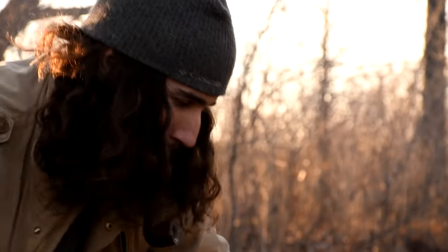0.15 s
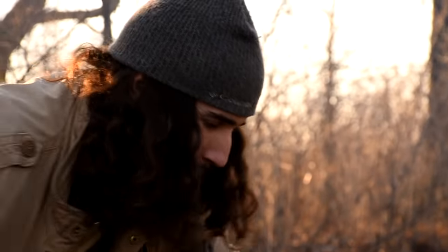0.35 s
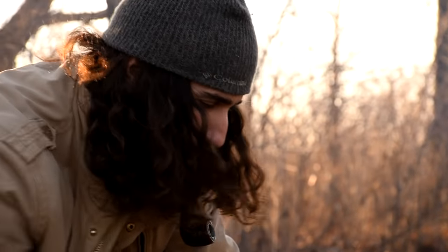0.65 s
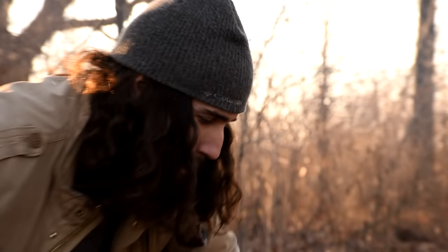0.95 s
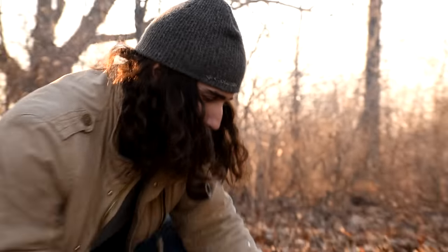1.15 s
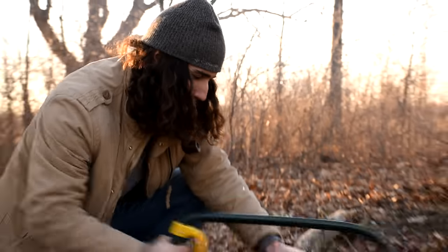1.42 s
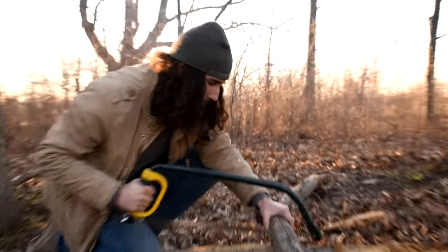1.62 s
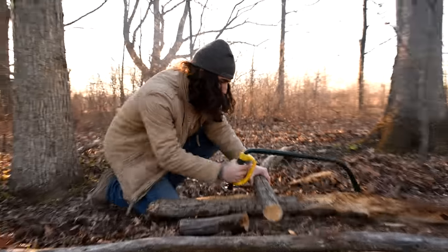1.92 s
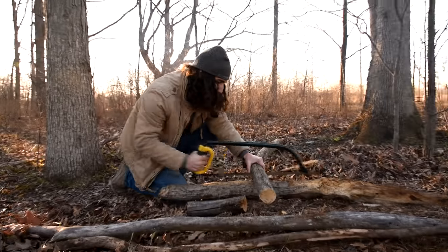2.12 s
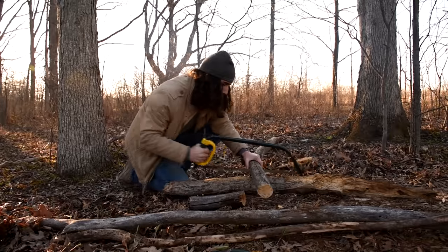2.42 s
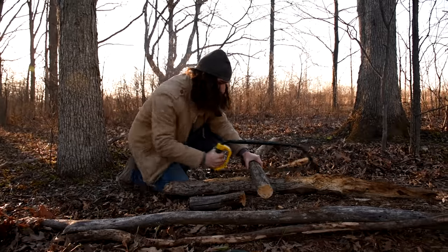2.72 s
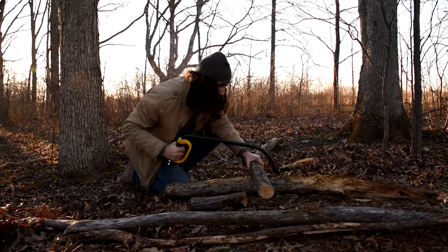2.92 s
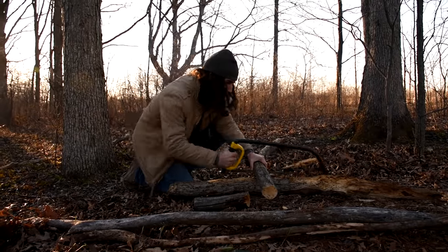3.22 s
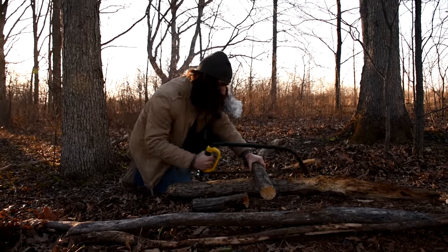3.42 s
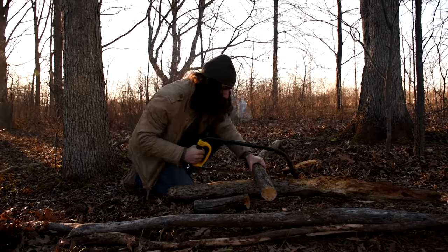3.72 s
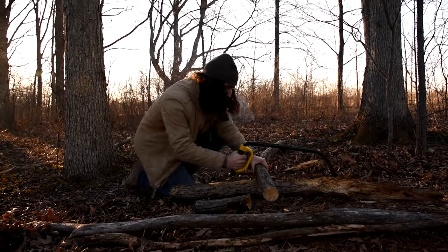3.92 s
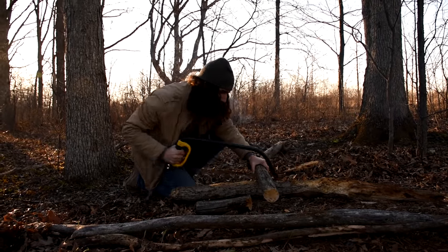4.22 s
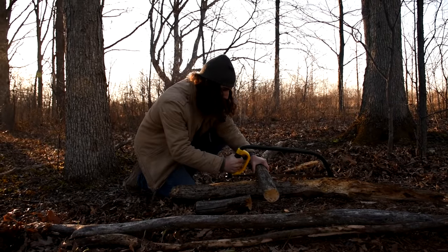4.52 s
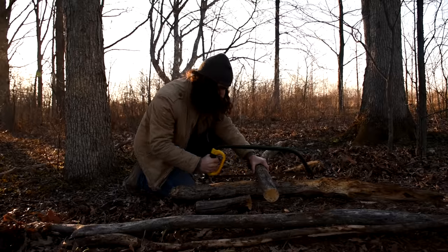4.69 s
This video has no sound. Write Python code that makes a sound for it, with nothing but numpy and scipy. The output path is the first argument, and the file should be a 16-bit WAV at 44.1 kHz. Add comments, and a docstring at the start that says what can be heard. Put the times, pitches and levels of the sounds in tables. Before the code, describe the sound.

A hand saw works steadily through dry wood outdoors, heard close to the microphone. Rough tearing strokes swell and dip in a fast, even rhythm, with steel blade and frame ringing, the log humming briefly, and occasional snags and snaps. Wind buffets the microphone softly over a thin leaf rustle; trunks return only a slight short echo. The sawing continues until the end.

```python
"""Wind rumbles, and almost at once a bow saw starts cutting a dry log in a wood, about three strokes a second.
Teeth tear fibres in a dense, uneven rattle: random clicks that rasp and hiss in the cut, thud in the log
and ring the steel blade and frame. Snagged teeth snap as bursts of noise; the log hums and, while
the saw turns, thin squeaks sing as gliding notes. The wind is coloured noise, and a fading
noise tail makes the trees answer faintly."""
import sys
import numpy as np
from scipy import signal
from scipy.fft import rfft, irfft, next_fast_len
from scipy.io import wavfile
from scipy.ndimage import uniform_filter1d, map_coordinates

SR = 44100
rng = np.random.default_rng(int(sys.argv[2]) if len(sys.argv) > 2 else 0)


def dump_mix(stems):
    """Bounce the given channels to the path in sys.argv[1] as a 16-bit WAV at rate SR."""
    frames = np.atleast_2d(stems).T  # one column per channel
    limited = np.clip(frames, -1, 1)  # hard clip at full scale
    pcm = np.round(limited * 32767).astype(np.int16)
    wavfile.write(sys.argv[1], SR, pcm)


def convert_level_to_amplitude(level_db):
    """Map a level in decibels to its linear amplitude factor."""
    exponent = np.asarray(level_db, float) / 20
    return 10 ** exponent


N = 214095  # length of the scene in samples

# saw strokes, push and pull in turn, levels before the mix:
# (start [s], fastest [s], stop [s], rasp at full speed [dB], hiss over rasp [dB])
STROKES = [(.028, .199, 0.32, -20.5, -2.5), (.327, .522, 0.62, -16, -4.5), (.642, .838, 0.964, -21.5, -5),
           (1.044, 1.226, 1.338, -17.5, -3.5), (1.341, 1.515, 1.642, -17.9, -4.2),
           (1.639, 1.865, 1.95, -16, -4), (2.03, 2.19, 2.316, -17.5, -4.5),
           (2.338, 2.542, 2.651, -16.5, -6), (2.699, 2.82, 2.999, -17.5, -4.5),
           (3.026, 3.222, 3.333, -16.5, -3.5), (3.374, 3.528, 3.644, -17, -5.5),
           (3.655, 3.874, 3.979, -16, -5.5), (4.016, 4.105, 4.34, -16, -5.5),
           (4.333, 4.524, 4.609, -15, -3.5), (4.627, 4.821, 4.921, -15, -6.5)]
# the blade bites deeper, or skips, for a moment: (time [s], gain [dB], length [s])
SURGES = [(0.049, 4.5, 0.0038), (0.089, 7, 0.01), (0.158, 3.5, 0.0099), (0.206, 3, 0.013),
          (0.568, 2.5, 0.012), (0.715, 8.5, 0.018), (0.763, 3, 0.017), (0.79, 7, 0.006),
          (0.824, 3.6, 0.012), (0.916, 2.5, 0.02), (0.99, 13, 0.014), (1.248, -4, 0.006),
          (1.376, -6, 0.022), (1.469, 2.5, 0.007), (1.692, 0, 0.0028), (1.908, 5, 0.0079),
          (2.084, 5, 0.016), (2.11, -3, 0.022), (2.36, -1, 0.0023), (2.593, 3.5, 0.027), (2.754, 4, 0.009),
          (2.785, -8, 0.0054), (2.868, 2.5, 0.007), (3.05, 5.5, 0.007), (3.09, -4, 0.0068),
          (3.152, 2.5, 0.013), (3.209, 1.5, 0.018), (3.375, 19, 0.007), (3.416, 4.0, 0.011),
          (3.445, 6.5, 0.0055), (3.489, 0, 0.0081), (3.73, -7, 0.0048), (3.935, 0.5, 0.03),
          (4.036, -5.7, 0.0061), (4.054, 4, 0.0074), (4.113, 1.5, 0.022), (4.168, 4, 0.017),
          (4.281, -1.5, 0.03), (4.362, 5, 0.0036), (4.431, 1.5, 0.0082), (4.75, 3, 0.0084),
          (4.777, 3.5, 0.016)]


def unit(x):
    """Scales a sound to an rms (average strength) of 1."""
    return x / np.sqrt(np.mean(x ** 2) + 1e-20)


def along(points, hz):
    """Reads a curve of (frequency [Hz], value) points, evenly spaced by pitch."""
    f, v = np.transpose(points)
    return np.interp(np.log(hz + 1), np.log(f + 1), v)


def curves(rows):
    """Draws straight lines between rows: one value per sample for each column after the time."""
    s, *columns = np.transpose(rows)
    return [np.interp(np.arange(N) / SR, s, column) for column in columns]


def wobble(rate):
    """A smooth random curve through rate random points a second."""
    points = rng.standard_normal(int(5 * rate) + 9)
    return map_coordinates(points, [np.arange(N) * rate / SR])


def bumps(rows):
    """Adds up brief bell-shaped rises or dips from (time [s], gain [dB], length [s]) rows."""
    out = np.zeros(N)
    for s, db, length in rows:
        first = max(round((s - 3 * length) * SR), 0)
        last = min(round((s + 3 * length) * SR), N)
        i = np.arange(first, last)
        out[i] += db * np.exp(-((i / SR - s) / length) ** 2)
    return out


def filtered(x, response):
    """Multiplies each frequency of x by a response, which may be complex."""
    m = next_fast_len(N + SR // 2)
    return irfft(rfft(x, m) * response(np.fft.rfftfreq(m, 1 / SR)), m)[:N]


def coloured(x, spectrum):
    """Shapes x with (frequency [Hz], level [dB]) points, then scales it to rms 1."""
    return unit(filtered(x, lambda hz: convert_level_to_amplitude(along(spectrum, hz))))


def patchy(x, patchy_db):
    """Each fibre sounds its own colour: random gain patches over time and pitch."""
    z = signal.stft(x, nperseg=256)[2]
    across_pitch = uniform_filter1d(rng.standard_normal(z.shape), 5, 0)
    patches = unit(uniform_filter1d(across_pitch, 7, 1))
    return unit(signal.istft(z * convert_level_to_amplitude(patchy_db * patches), nperseg=256)[1][:N])


def mode(hz, centre_hz, width_hz):
    """One resonance: the response is strongest at its centre and dies away in time after a knock."""
    return 1j * hz * width_hz / (centre_hz ** 2 - hz ** 2 + 1j * hz * width_hz)


def sliding_mode(drive, hz, width_hz):
    """A resonance whose pitch moves: shift down to 0 Hz, ring there, shift back."""
    spin = np.exp(2j * np.pi * np.cumsum(hz) / SR)
    pole = np.exp(-np.pi * width_hz / SR)  # a wider resonance dies sooner
    ringing = signal.lfilter([1 - pole], [1, -pole], drive / spin)
    return 2 * (spin * ringing).real


def tone(rows, rise, drift, octave_db):
    """Short wavering notes with one overtone; each glides, swells over the share rise of its length and fades."""
    out = np.zeros(N)
    bend, waver = 1 + drift * wobble(60), convert_level_to_amplitude(2.9 * wobble(40))
    for start, length, first_hz, last_hz, db in rows:
        i = np.arange(round(start * SR), min(round((start + length) * SR), N))
        u = (i / SR - start) / length  # progress through the note, 0 to 1
        hz = (first_hz + (last_hz - first_hz) * u) * bend[i]
        phase = 2 * np.pi * np.cumsum(hz) / SR
        swell = np.sin(np.pi / 2 * np.interp(u, [0, np.clip(rise, .05, .95), 1], [0, 1, 0]))
        out[i] += convert_level_to_amplitude(db) * swell * (np.sin(phase) + convert_level_to_amplitude(octave_db) * np.sin(2 * phase))
    return 2 ** .5 * waver * out


def wind():
    """Lumpy buffeting on the microphone over a thin rustle of far leaves, both made of coloured noise."""
    # strength of the buffeting: (time [s], level [dB])
    gusts = [(0.0, -28), (0.07, -38), (0.11, -30.5), (0.81, -34), (1.46, -31.5), (1.51, -39), (1.62, -30.5),
             (1.67, -33), (1.71, -23), (1.81, -33), (2.11, -28.5), (2.21, -36), (2.39, -22.5), (2.44, -34),
             (2.55, -35), (2.58, -28), (2.93, -30.5), (2.96, -33), (3.39, -27), (3.66, -33.5),
             (3.67, -27.5), (4.0, -36), (4.81, -29), (4.85, -40)]
    # colour of the buffeting: (frequency [Hz], level [dB per Hz])
    rumble = [(12, -59), (25, 1), (36, 2), (60, -6.5), (90, -5), (150, -19.5), (250, -27), (500, -48.5)]
    # colour of the far leaves: (frequency [Hz], level [dB per Hz])
    leaves = [(100, -4), (250, 2.5), (700, -11.5), (1500, -7.5), (3500, -11), (5000, -36), (9000, -39),
              (12000, -44), (16000, -50)]
    (buffet_db,) = curves(gusts)
    buffet = unit(convert_level_to_amplitude(0.66 * wobble(11)) * coloured(rng.standard_normal(N), rumble))
    rustle = convert_level_to_amplitude(-46.5 + 0.55 * wobble(4.0)) * coloured(rng.standard_normal(N), leaves)
    return convert_level_to_amplitude(buffet_db) * buffet + rustle


def strokes():
    """Blade speed rises and falls as two quarter waves; it sets the levels of rasp and hiss."""
    t = np.arange(N) / SR
    # the blade scuffs in the cut while the saw turns: rasp and hiss, before the mix [dB]
    rasp, hiss, speed = convert_level_to_amplitude(-47.5) ** 2, convert_level_to_amplitude(-57) ** 2, 0
    for k, (start, fastest, stop, db, hiss_db) in enumerate(STROKES):
        # loudness grows as speed to this power; brake under 1: the arm starts braking early;
        # fade_db: change of the hiss from start to stop
        if k % 2:
            power, brake, fade_db = 1.54, .68, 0  # pull
        else:
            power, brake, fade_db = 1.29, .92, -3  # push
        speeding_up = np.interp(t, [start, fastest], [0, 1])
        slowing = np.interp(t, [fastest, stop], [0, 1]) ** brake
        moving = np.sin(np.pi / 2 * (speeding_up - slowing))
        loud = (convert_level_to_amplitude(db) * moving ** power) ** 2
        fade = fade_db * np.interp(t, [start, stop], [-.5, .5])
        rasp = rasp + loud
        hiss = hiss + loud * convert_level_to_amplitude(hiss_db + fade) ** 2
        speed = np.maximum(speed, moving)
    return 10 * np.log10(rasp), 10 * np.log10(hiss), speed


def teeth(phase, per_s, spread_db, chatter_db, gate_db):
    """Fibres break at random moments, a few much harder, bunched by each passing tooth and by blade chatter."""
    chance, size, side = rng.random((3, N))
    strength = (1 - size) ** (-spread_db / 20)
    clicks = (chance < per_s / SR) * strength * np.sign(side - .5)
    bunch_db = gate_db * np.sin(phase) + chatter_db * (wobble(28) + 0.45 * wobble(80))
    return unit(clicks * convert_level_to_amplitude(bunch_db)) * convert_level_to_amplitude(bumps(SURGES))


def tearing_rasp(bite, rasp_db):
    """The breaking fibres sound through the broad colour of tearing wood."""
    # colour of tearing wood: (frequency [Hz], level [dB per Hz])
    colour = [(400, -42), (900, -13), (1400, -1), (2500, -1.5), (4000, 0), (5000, -9.5), (7000, -27)]
    return convert_level_to_amplitude(rasp_db - 5.5) * patchy(coloured(bite, colour), patchy_db=3.5)


def fibre_hiss(bite, hiss_db):
    """The same breaking fibres give a brighter hiss."""
    # colour of the hiss: (frequency [Hz], level [dB per Hz])
    colour = [(3500, -12), (5000, -4), (6500, 2.5), (8800, -3), (10700, -2.5), (13000, -6.5), (15500, -23),
              (17000, -45)]
    return convert_level_to_amplitude(hiss_db - 8.0) * patchy(coloured(bite, colour), patchy_db=5.5)


def log_thud(bite, rasp_db, speed):
    """The bite shakes the log, whose resonances turn it into a thud."""
    # resonances of the log: (pitch [Hz], width [Hz], level [dB])
    log_modes = [(217.4, 148, -9), (291, 66, 0), (383, 59.4, 0.5), (430, 92, 0), (612, 135, -6.5),
                 (781, 60, -3)]
    # the blade catches and thumps the log: (time [s], gain [dB], length [s])
    thumps = [(.092, 3.5, 0.011), (.712, 6, 0.0072), (1.25, 8.5, .015), (2.088, 5.5, 0.015),
              (2.757, 6.5, .012), (3.2, 4.5, 0.038), (4.06, 2, 0.026), (4.27, 6, .025), (4.52, 6.5, 0.021)]

    def wood(hz):
        # every other mode is turned upside down
        return sum((-1) ** k * convert_level_to_amplitude(db) * mode(hz, c, w) for k, (c, w, db) in enumerate(log_modes))

    thud_db = rasp_db - 11 + 8 * (1 - speed)  # gains up to 8 dB on the rasp as the blade slows
    knocks = bite * convert_level_to_amplitude(1.96 * wobble(16) + bumps(thumps))
    return convert_level_to_amplitude(thud_db) * unit(filtered(knocks, wood))


def steel_ring(bite, rasp_db, hiss_db, snaps):
    """Blade and frame ring at many pitches that bend and swell as the cut slides along the blade."""
    # middle pitch of each way the steel rings: [Hz]
    steel_hz = [1150, 1497, 1835, 2080, 2300, 2505, 2725, 2925, 3420, 3692, 4022, 5180, 5630, 6065, 6390,
                6715, 6950, 7378, 8720, 9280, 9640, 9740, 10300, 10720, 10760, 11600]
    # the same modes, drive before the mix:
    # (width [Hz], level on the push [dB], level on the pull [dB], rise of pitch along a push [%])
    steel = [(75, -10, 0.5, -2.5), (75.5, 0.5, 2, 4), (79, -4.5, -1, 0.2), (108, -3.5, -7.5, 8),
             (61, -4, -4, -1.5), (78, -3, -1, -5), (64.3, -3.5, -9, -10.5), (50.3, -5.5, -2, 1.5),
             (33, 1.5, 3, 0), (40.3, 1, -2, 4.4), (47.5, -11, -21, 5), (83.333, -12, -13, 7),
             (58, -13, -6, -1), (11, 5, 5, 0.6), (70, -8, 0.5, 5.5), (30, 0.5, -16, -2.5), (50, -6, -8, 12),
             (46.4, -4, -4, -2.5), (40, -22, -15.5, -3.5), (47, -73, -71, 0.13), (148, -10, -17.5, -4),
             (15, -1, 0, -0.2), (70, -10, -9, -2), (11, 3.5, -1, 0.7), (129, 0.5, -1, 2.8),
             (62, -7, -10, 0)]
    # one mode, the nearest in pitch, is driven harder or softer: (time [s], pitch [Hz], gain [dB], length [s])
    singing = [(0.25, 8900, 13, 0.08), (0.573, 6390, 14.5, 0.014), (.57, 10720, 21, 0.015),
               (.57, 6700, 13, .02), (0.92, 10600, 12.5, .03), (0.903, 1150, 16, 0.046),
               (1.117, 3420, 12, 0.036), (1.5, 3420, 6, 0.036), (1.25, 8100, 26, .02), (.57, 6065, -5, .02),
               (2.2, 6065, 5, 0.018), (1.54, 8720, 10, 0.016), (2.23, 12000, 9, 0.046),
               (2.24, 7300, 9, 0.036), (1.5, 2925, 19, 0.018), (2.85, 2300, 13.5, 0.025),
               (1.9, 4022, 16, 0.031), (4.2, 3420, 8, 0.026), (3.6, 6065, 10, .03), (4.11, 10720, 9, 0.018),
               (3.2, 6065, 13, 0.035), (4.25, 9740, 1, 0.036), (4.469, 6715, 23, 0.019)]
    turns = [(s, k % 2) for k, row in enumerate(STROKES) for s in (row[0] + .02, row[2] - .02)]
    (pull,) = curves(turns)  # 0 on the push, 1 on the pull
    ends = [(row[0], k % 2 - .5) for k, row in enumerate(STROKES)]
    (place,) = curves(ends + [(STROKES[-1][2], .5)])  # place of the cut along the blade
    out = 0
    for centre_hz, (width_hz, push_db, pull_db, rise) in zip(steel_hz, steel):
        songs = []
        for s, hz, db, length in singing:
            nearest_hz = min(steel_hz, key=lambda f: abs(f - hz))
            if nearest_hz == centre_hz:
                songs.append((s, db, length))
        effort_db = (hiss_db if centre_hz > 5000 else rasp_db) + bumps(songs)
        stroke_db = push_db + pull * (pull_db - push_db)
        drive = bite * convert_level_to_amplitude(effort_db + stroke_db + 2.3 * wobble(12) + 8.5)
        drive = drive + snaps * convert_level_to_amplitude(push_db + 15)  # snaps ring the steel too
        out = out + sliding_mode(drive, centre_hz * (1 + rise / 100 * place), width_hz)
    return out


def saw():
    """The same bite drives wood, log and steel, with snaps and hums on top."""
    rasp_db, hiss_db, speed = strokes()
    # the treble takes an extra share of each surge and flickers by itself
    hiss_db = hiss_db + 0.43 * bumps(SURGES) + 2 * wobble(40)
    teeth_hz = 340  # teeth passing the cut each second at full speed
    phase = 2 * np.pi * np.cumsum(teeth_hz * speed) / SR
    bite = teeth(phase, per_s=9000, spread_db=3.0, chatter_db=0.72, gate_db=1.0)
    snaps = ticks()
    wood = tearing_rasp(bite, rasp_db) + fibre_hiss(bite, hiss_db) + log_thud(bite, rasp_db, speed)
    return wood + log_hums() + steel_ring(bite, rasp_db, hiss_db, snaps) + snaps


def trees(x):
    """The trunks send back a faint echo; each frequency of it dies at its own speed."""
    # time for the echo to fade by 60 dB: (frequency [Hz], time [s])
    fading = [(300, 0.25), (2000, 0.34), (10000, 0.18)]
    # bark and leaves swallow the echo's treble: (frequency [Hz], level [dB])
    dulling = [(200, 12), (3500, -14), (6000, -3.5), (16000, -18)]
    dull = filtered(x, lambda hz: convert_level_to_amplitude(along(dulling, hz)))
    hz, t, z = signal.stft(rng.standard_normal(SR // 2), SR, nperseg=256)
    decay = convert_level_to_amplitude(-60 * t / along(fading, hz)[:, None])
    tail = signal.istft(z * decay, SR, nperseg=256)[1]
    late = np.pad(dull, (600, 0))  # the echo starts 600 samples late
    return convert_level_to_amplitude(-26) * signal.fftconvolve(late, tail / np.linalg.norm(tail))[:N]


def ticks():
    """A snagged tooth lets go: a sudden burst of noise, strongest around one pitch."""
    # sharp snaps and ticks: (time [s], peak level [dB], pitch [Hz], time to fade by 60 dB [s])
    snags = [(.0463, -28, 5130, 0.022), (.0867, -23, 2420, .015), (.3471, -38, 6070, .025),
             (.6629, -35.5, 9000, .03), (2.3576, -43, 3570, .025), (2.338, -45, 10000, .015),
             (2.6416, -24.5, 2320, 0.0085), (3.1467, -16, 2510, .004), (4.024, -35, 7990, 0.029),
             (4.0697, -16, 13550, 0.0036), (4.0784, -12, 9980, 0.0041), (4.0877, -5.5, 10300, 0.0048),
             (4.0964, -6, 10700, 0.0034), (4.1195, -4, 10600, 0.0037), (4.139, -10, 11900, 0.0045),
             (4.1795, -13, 8960, 0.0041), (4.36, -26, 3240, .005), (4.3641, -19, 4400, 0.0056),
             (4.6391, -34, 5500, 0.026)]
    out, t = np.zeros(N + SR), np.arange(SR // 20) / SR
    for s, db, hz, t60 in snags:
        fade = convert_level_to_amplitude(-60 * t / np.clip(t60, .002, .05))
        burst = fade * (rng.standard_normal(len(t)) + 0.19 * np.sin(2 * np.pi * hz * t))
        peak = signal.iirpeak(hz, .8, SR)
        band = signal.lfilter(*peak, signal.lfilter(*peak, burst))  # twice: steep on both sides
        out[round(s * SR):][:len(t)] += convert_level_to_amplitude(db) * band / np.abs(band).max()
    return out[:N]


def log_hums():
    """The log hums for a moment: low gliding notes with a clear overtone."""
    # hums: (start [s], length [s], first pitch [Hz], last pitch [Hz], level [dB])
    hums = [(.08, 0.072, 288, 308, -44), (.46, 0.11, 357, 352, -31), (.77, 0.12, 301, 290, -35),
            (1.2, 0.079, 402, 450, -31.5), (1.51, 0.068, 309, 296, -29.5), (1.72, 0.077, 294, 361, -38),
            (1.86, 0.089, 394, 346, -32.5), (2.125, 0.16, 265, 305, -34.5), (2.48, 0.071, 347, 364, -24.5),
            (2.57, 0.064, 248, 235.5, -32), (2.77, 0.078, 285, 290, -31.5), (3.18, 0.101, 315, 352, -33.5),
            (3.4, 0.19, 265, 270, -37), (3.82, 0.066, 335, 313, -29.5), (4.04, 0.1, 246, 260, -37),
            (4.11, 0.12, 284, 280, -24), (4.47, .1, 376, 345, -26), (4.74, 0.11, 289, 260, -24.5)]
    return tone(hums, rise=0.44, drift=0.028, octave_db=-12)


def turning_squeaks():
    """Thin squeaks while the saw turns: nearly pure, high gliding notes."""
    # squeaks: (start [s], length [s], first pitch [Hz], last pitch [Hz], level [dB])
    squeaks = [(.59, .095, 2098, 2080, -48), (.92, 0.1, 3150, 3170, -48), (.978, .085, 2580, 2580, -38.5),
               (1.318, .05, 2420, 2570, -44), (1.935, .06, 2800, 2800, -50), (1.975, 0.04, 2470, 2220, -48),
               (2.005, 0.023, 2180, 2420, -45)]
    return tone(squeaks, rise=0.34, drift=0.0045, octave_db=-21)


def scene():
    """Saw close by, its echo and the wind."""
    near = saw() + turning_squeaks()
    return (near + trees(near) + wind())[None]


def roll_off(x):
    """The treble ends steeply here."""
    return signal.sosfilt(signal.butter(12, 16240, fs=SR, output="sos"), x)


def record(dry):
    """Peaks are clipped at full scale, then everything from 15950 Hz up is cut away."""
    clipped = np.clip(dry[0], -1, 1)
    mix = filtered(clipped, lambda hz: hz < 15950)[None]
    return roll_off(mix)


dry = scene()
out = record(dry)
dump_mix(out)
```